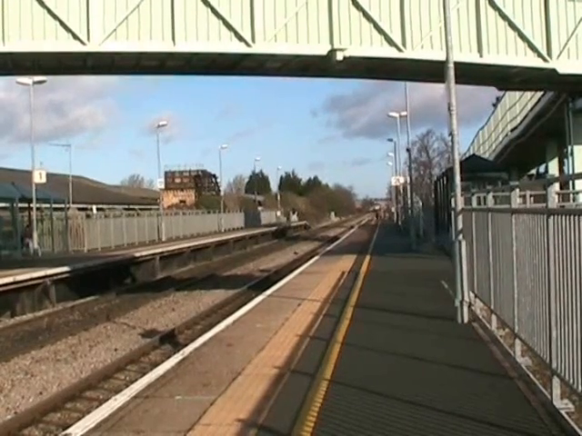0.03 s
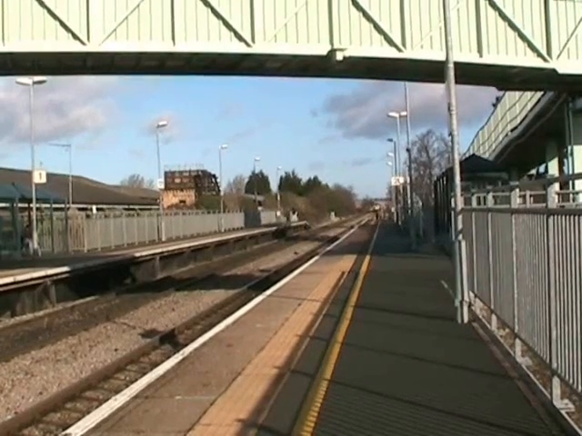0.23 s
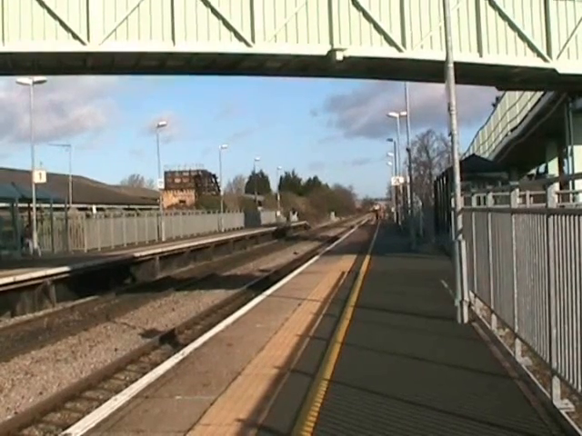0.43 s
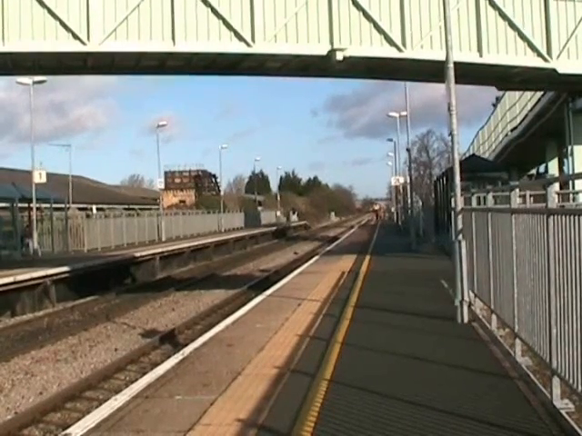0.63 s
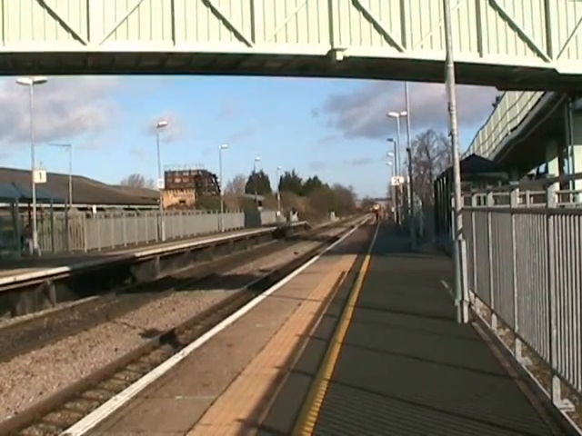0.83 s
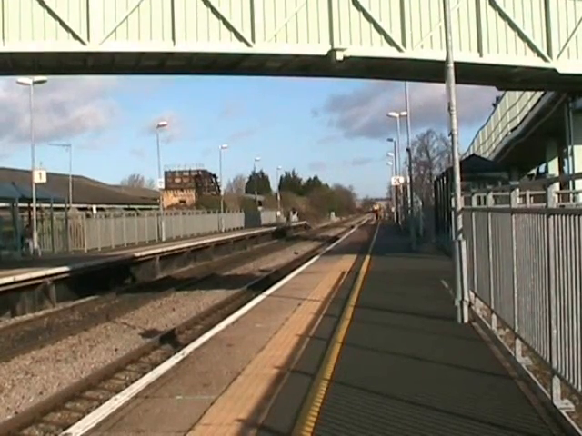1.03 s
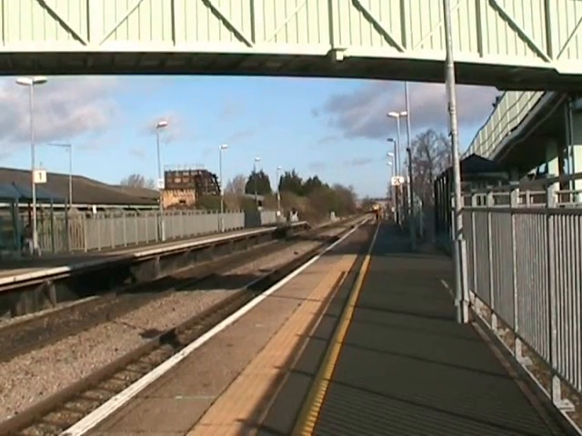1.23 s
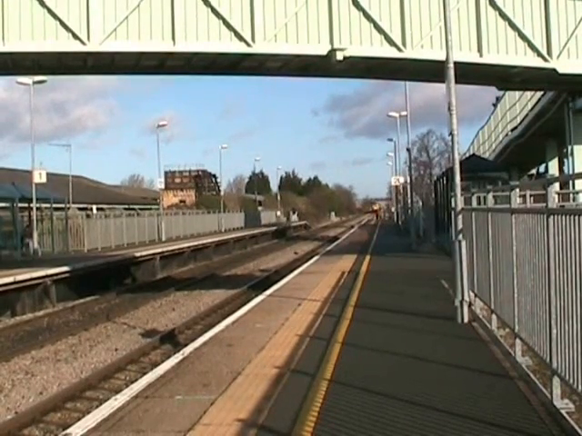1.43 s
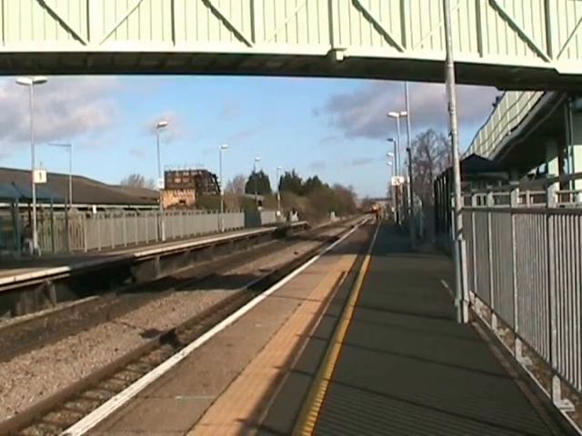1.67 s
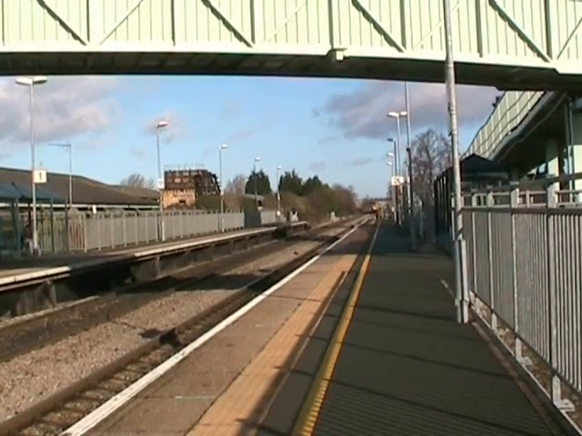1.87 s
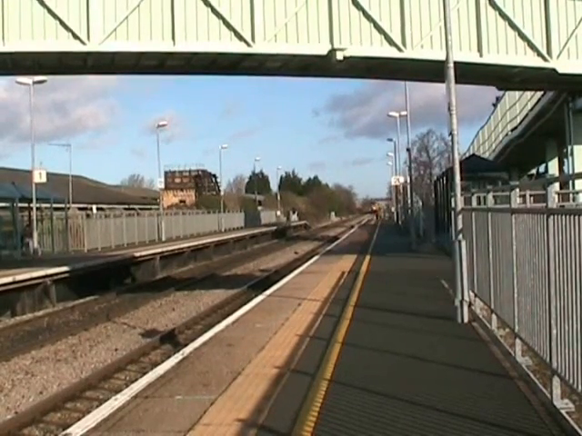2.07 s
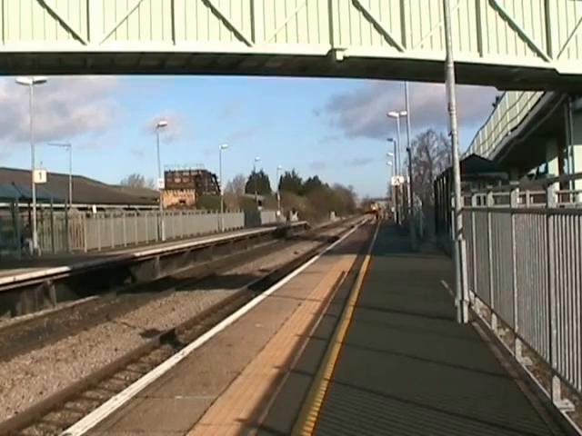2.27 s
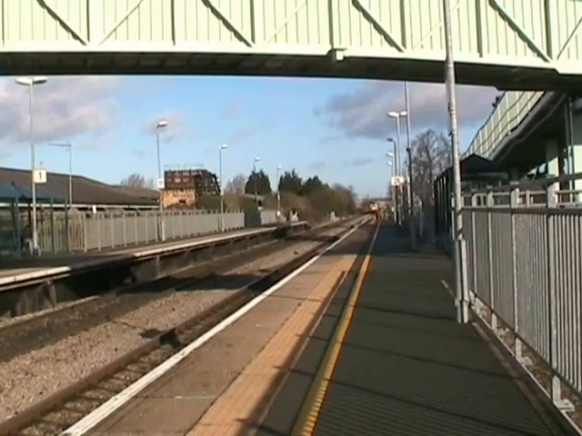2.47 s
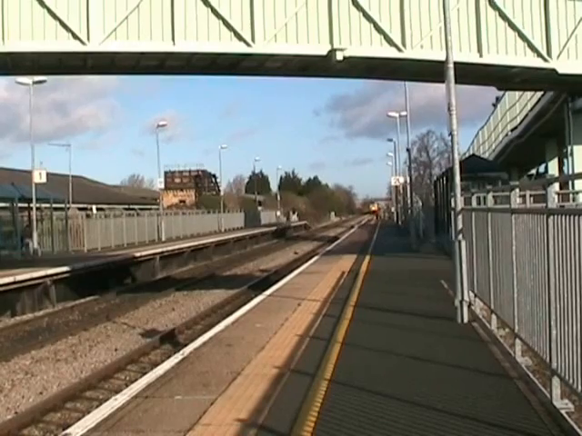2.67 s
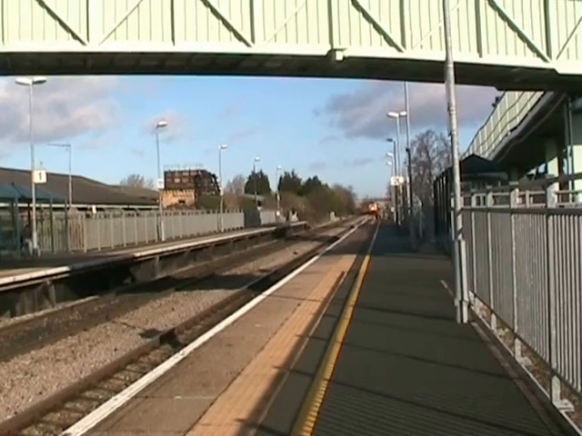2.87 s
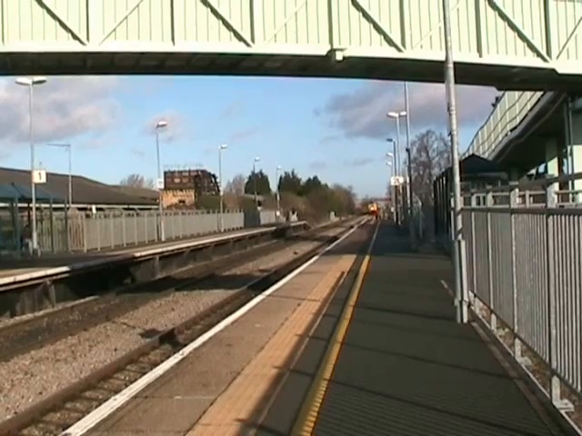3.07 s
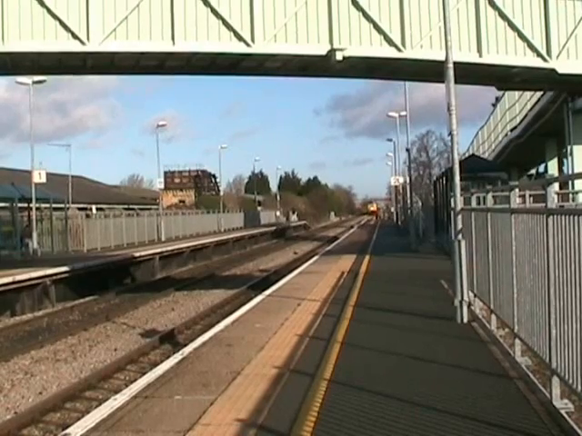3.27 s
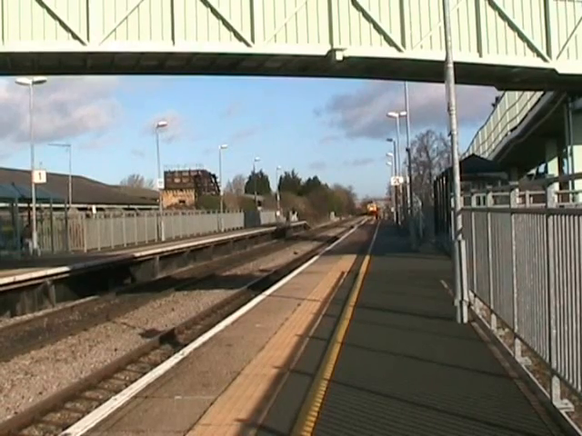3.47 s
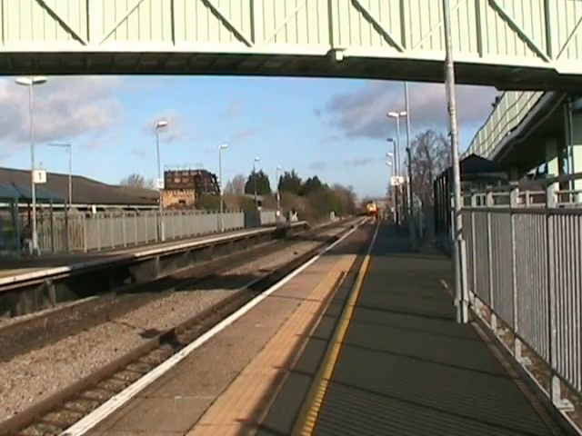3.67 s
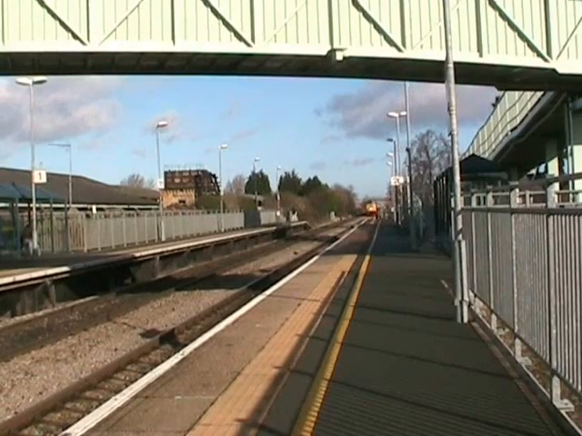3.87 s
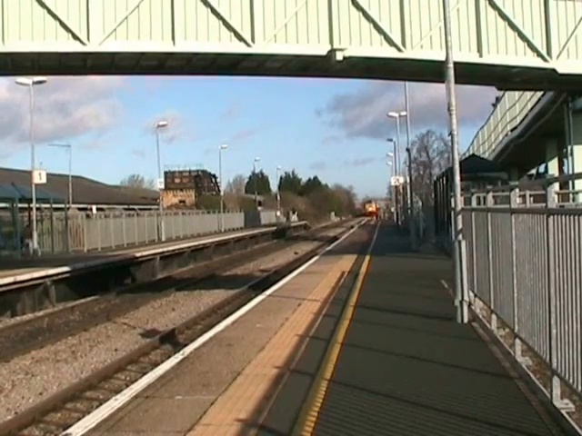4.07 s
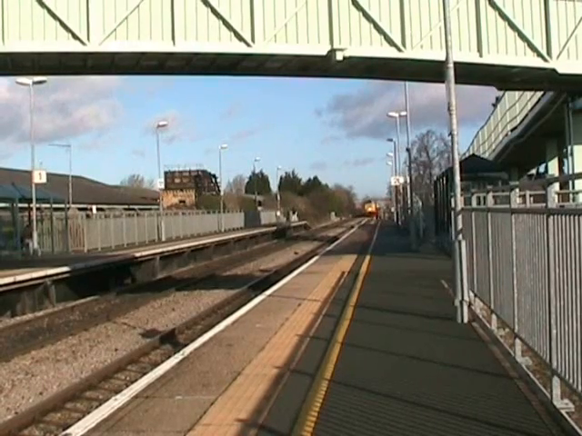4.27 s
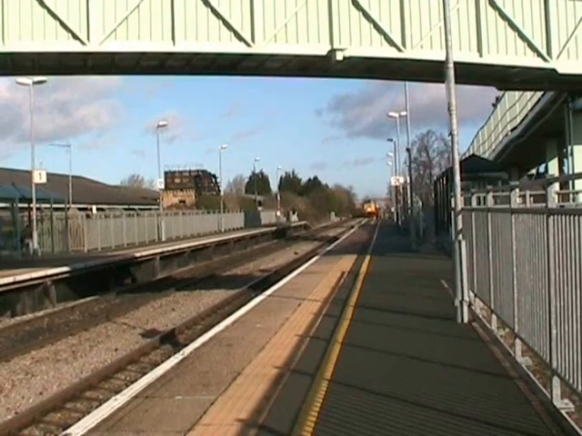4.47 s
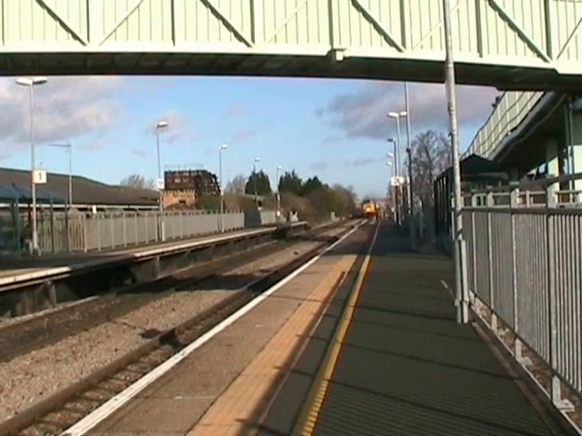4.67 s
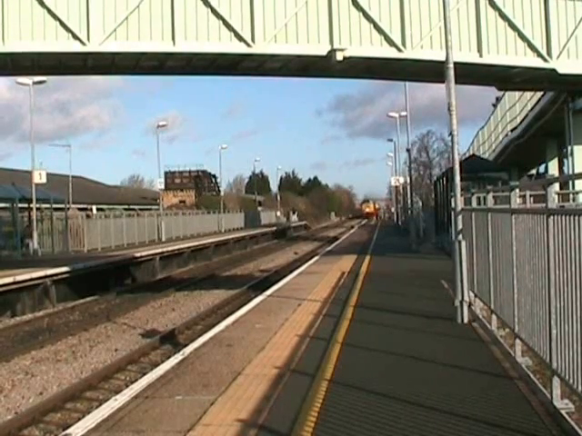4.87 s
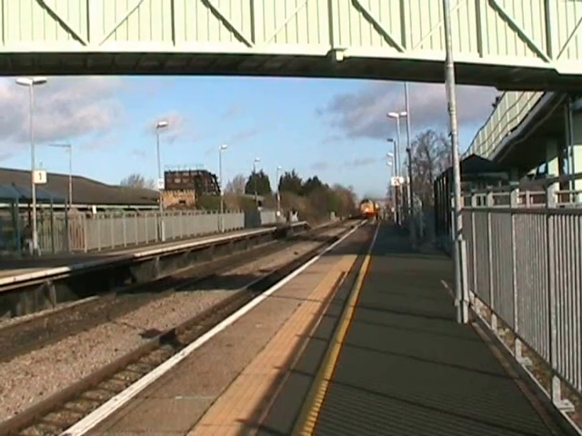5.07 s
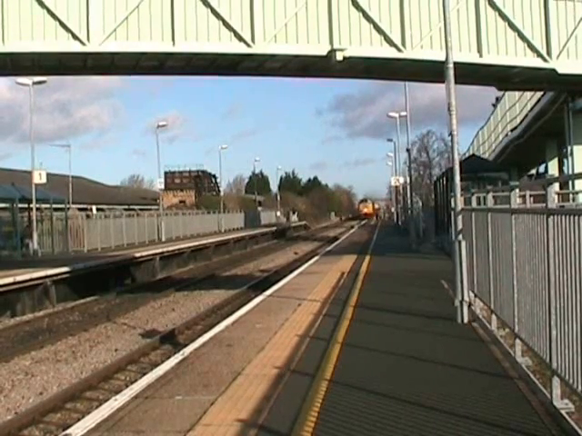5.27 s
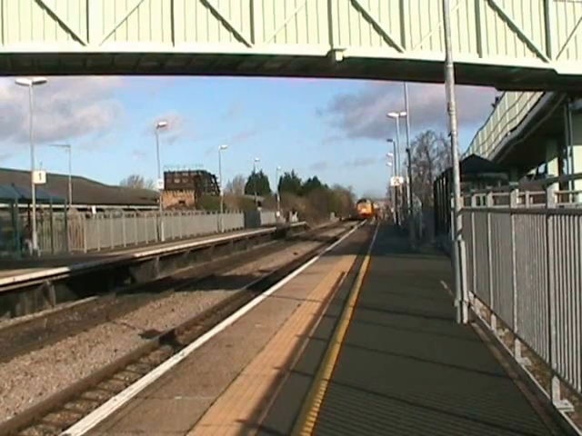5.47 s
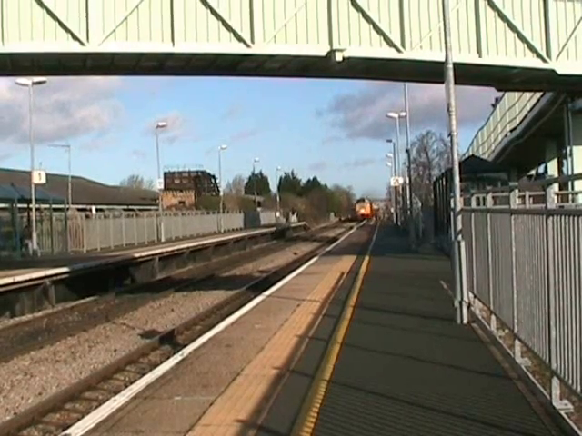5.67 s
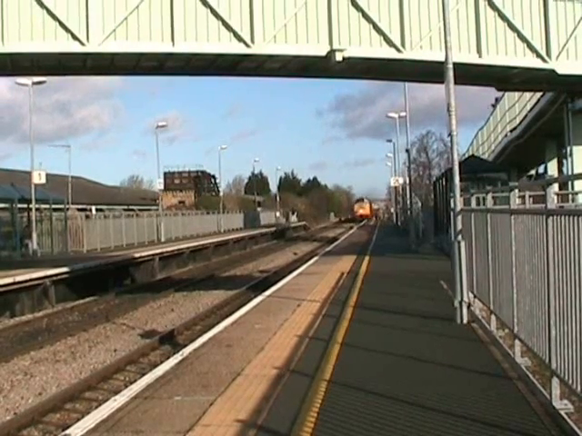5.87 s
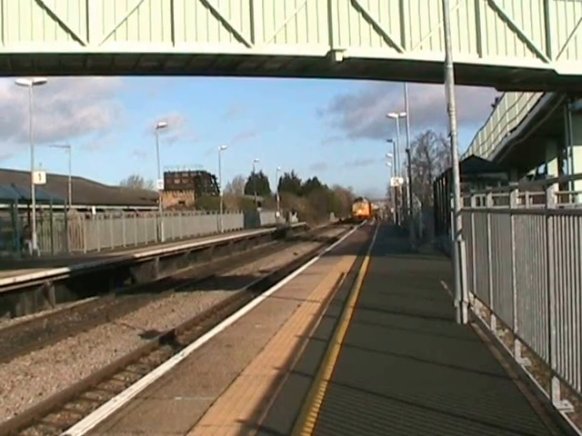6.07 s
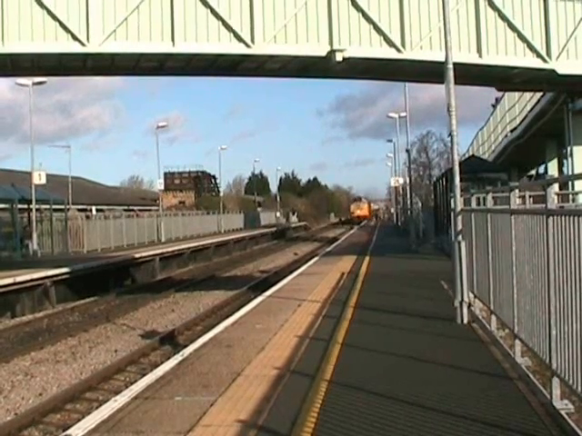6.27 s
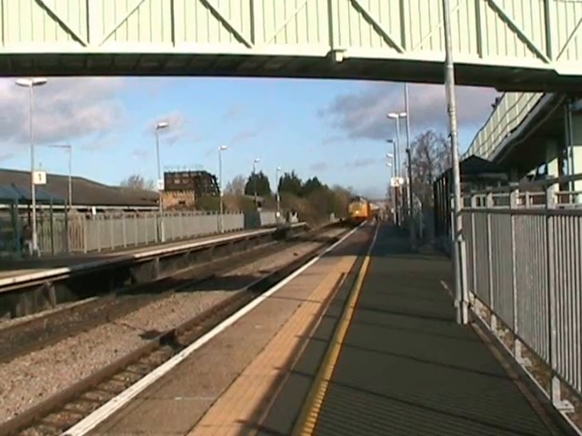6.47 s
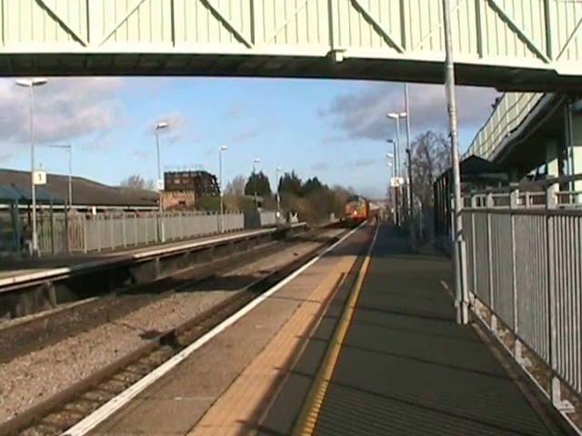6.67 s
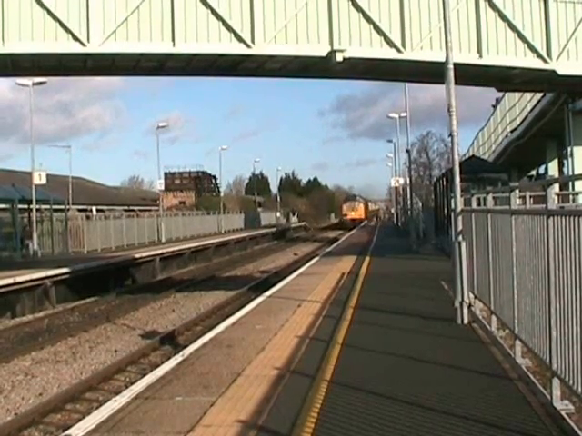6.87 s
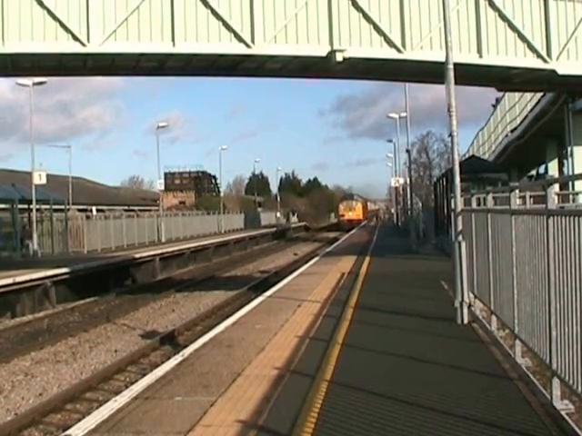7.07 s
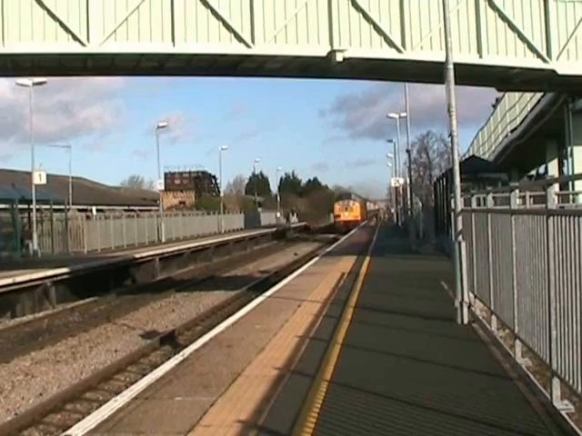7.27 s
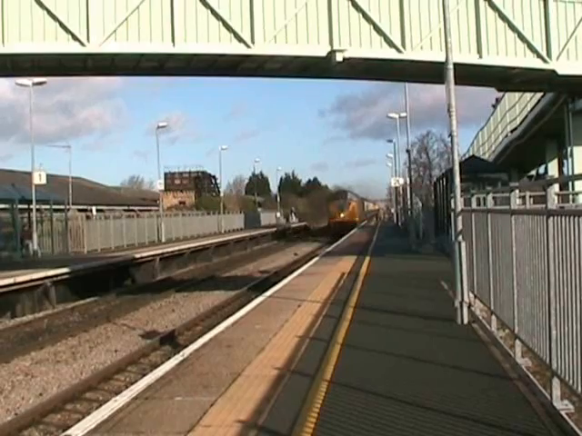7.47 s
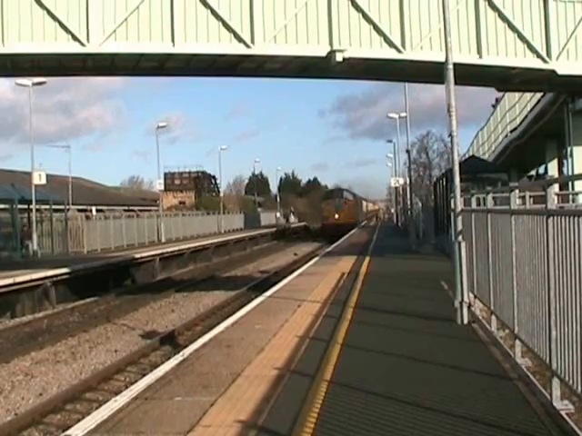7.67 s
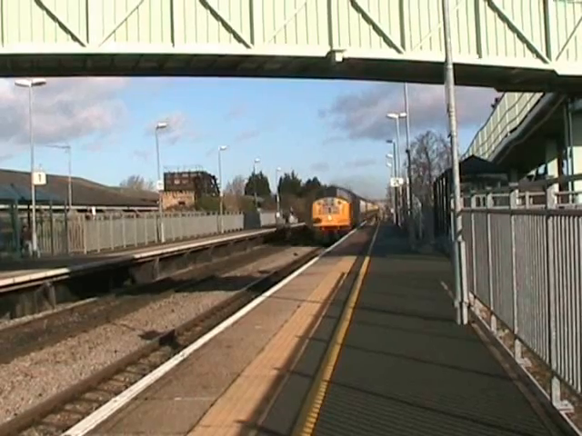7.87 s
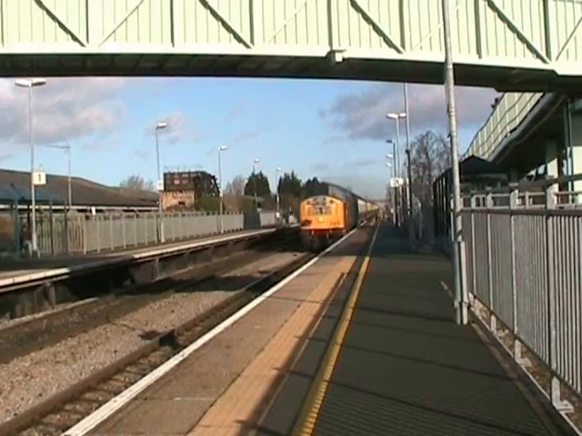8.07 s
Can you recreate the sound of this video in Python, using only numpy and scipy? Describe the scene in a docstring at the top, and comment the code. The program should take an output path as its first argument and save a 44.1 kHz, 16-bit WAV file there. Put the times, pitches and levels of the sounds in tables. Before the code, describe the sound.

A stationary stereo camera microphone on an open station platform picks up airy hiss, a faint hum, thin motor whine and a distant diesel throb. A tiny click comes at 0.5 s. From about 1 to 4 s a far road vehicle gathers speed, its low drone rising in pitch and wavering in level, while the locomotive's bass fades and returns. Close dry clicks cluster at 2.65 s and again near 3.05 s, with soft swishes around them. A thin, high squeal lingers faintly from 3.15 to 5 s. The engine swells with a hollow ring around 3.7 s, and its low bark growls near 5.2 s. From 5 to 8 s the uneven, rapid throb becomes a heavy full-power roar, with brightening wheel and rail hiss. Near the end automatic gain holds the level; the locomotive is still approaching when the sound stops at about 8 s.

```python
"""A faint hum, airy hiss and a distant throb come first; then a diesel locomotive under full power nears
a station platform, heard by a camera standing still. Sixteen uneven cylinders make the throb, a stack of
engine-cycle orders summed as sines, and filtered noise puffs in step as the roar. Wheels and rails hiss
more as it nears, until gain control holds the level. Sines also make a far road vehicle that gathers
speed, a thin squeal and a faint camera-motor whine; noise bursts with damped rings make close clicks."""
import sys
import numpy as np
from scipy import signal
from scipy.fft import rfft, irfft, next_fast_len
from scipy.io import wavfile
from scipy.ndimage import uniform_filter1d, map_coordinates

SR = 44100
rng = np.random.default_rng(int(sys.argv[2]) if len(sys.argv) > 2 else 0)


def digitize_waveform(pressure):
    """Quantize a signal to 16-bit integers and store it at the path in sys.argv[1].

    Rows of a 2-D input are taken as channels; values are limited to [-1, 1].
    """
    field = np.atleast_2d(pressure).T
    bounded = np.clip(field, -1, 1)
    quanta = np.round(bounded * 32767).astype(np.int16)
    wavfile.write(sys.argv[1], SR, quanta)


N = 357651
T = np.arange(N) / SR  # s
HZ = np.fft.rfftfreq(N, 1 / SR)

# Exhaust orders: (multiple of the cycle rate [1], relative level [dB]); order 11 takes the boom's level
EXHAUST_ORDERS = [(3, -33), (5, -14), (7, -8.5), (8, -12), (10, -10.5), (11, -2), (13, -9.5), (15, -22),
                  (16, -5), (17, -17), (18, -6), (19, -13.5), (20, 1.5), (21, -3.5), (22, -5), (23, -16),
                  (24, -6), (25, -19), (26, -5), (27, -5), (28, -11), (29, -16.5), (30, -12.5), (31, -8)]
# Orders that howl faintly through the roar: (multiple of the cycle rate [1], level against the roar [dB])
HOWLING_ORDERS = [(38, -19.5), (39, -22), (41, -20), (42, -20), (48, -21), (51, -21), (52, -17), (54, -18),
                  (60, -20), (63, -21.5), (67, -20.5), (76, -21.5)]
# Throb of each exhaust register: (upper limit [Hz], place in the cycle [0-1], relative phase scatter [1])
THROB_REGISTERS = [(115, .41, 0.52), (212, .82, 0.57), (400, .155, 0.65)]
# Strength of each cylinder's puff, in firing order: one column, relative level [dB]
CYLINDER_PUFFS = [-5, -3, -3, -2.5, -6, -5.5, -0.5, -9, -7.5, -1.5, -5, -2, -1.5, -7.5, -5.5, -5]
# Blower tones: (frequency [Hz], level against the exhaust roar [dB])
BLOWER_TONES = [(260.5, -14.5), (300, -19.5)]
# The bass fades and returns on its way: (time [s], boom level change [dB], beat level change [dB])
BASS_FADING = [(0, -12, 0.5), (1.35, 0, -4.5), (1.7, -19, -3), (2.0, -4, -4), (2.4, -1, -9), (3.1, 1, -7),
               (3.7, 1, -3.5), (4.5, 1.5, -6.5), (5.2, 1, -3), (5.7, 1.5, -2.5), (6.25, -5.5, 0),
               (6.6, -1.5, 0), (7.3, 1, -1), (7.7, 0.5, 0.5), (8.11, -5, -2.8)]
# Noise spectra of the locomotive: (frequency [Hz], relative density [dB])
RUMBLE_SPECTRUM = [(15, -22), (30, -18), (50, -5), (70, 8), (100, 5), (160, 0.5), (400, -75)]
BARK_SPECTRUM = [(50, -39), (90, 0), (125, -1.5), (170, -2), (245, -3.5), (285, -8.5), (400, -3),
                 (900, -88)]
ROAR_SPECTRUM = [(150, -16), (280, -4.5), (340, -2), (440, 1), (540, 2.5), (640, 3), (760, -1), (880, -10),
                 (1200, -7), (2000, -14), (5000, -77)]
ROLLING_SPECTRUM = [(300, -11), (800, -5), (1080, 2.5), (1280, -1), (1500, 1.5), (1750, -2), (2050, -4),
                    (2500, -9), (3300, -14.5), (5000, -19.5), (6500, -26), (9000, -34), (11500, -40.5),
                    (13000, -63)]
# Noise spectra of the clicks and of the open air: (frequency [Hz], relative density [dB])
CLICK_SPECTRUM = [(600, -25), (1500, 10.5), (2500, 7), (4300, 4.5), (6500, 0), (8500, -2), (10200, 0),
                  (11500, -38)]
AIR_SPECTRUM = [(40, 15), (200, 16), (350, 17.5), (500, 18.5), (850, 28.5), (1300, 19), (2500, 6),
                (3500, 1), (5000, 1), (5600, 5.5), (6800, -6.5), (8200, -17), (9300, 1.5), (10200, -9.5),
                (11000, 6.5), (11700, -26), (12500, -15.5)]
# Stereo width of train and air: (frequency [Hz], opposed against shared part [dB])
TRAIN_WIDTH = [(30, -4), (70, -31), (200, -6), (700, -15.5), (1400, -11.5), (2300, -26), (4000, -15),
               (7000, -6.5), (9000, -5), (11000, 10), (12500, 26)]
AIR_WIDTH = [(100, 15.5), (1500, -9), (3000, 4), (4200, -2.5), (6000, -2), (8000, -1), (11000, 5.5),
             (12500, 24.5)]
# Small close clicks: (time [s], nominal snap level [dB], ring [Hz], ring level [dB], snap decay [s],
# upper edge [Hz])
CLOSE_CLICKS = [(.499, -42, 2100, -34, 0.012, 7000), (2.65, -32, 2770, -22, 0.002, 10500),
                (2.6547, -33.5, 3000, -31, 0.0036, 11000), (2.6584, -37, 2100, -23, 0.0016, 10000),
                (2.6645, -41, 2300, -17, 0.0012, 7400), (3.0536, -38, 4040, -37, 0.015, 5000),
                (3.076, -35, 2100, -26, 0.007, 4800), (3.0805, -40, 1350, -20, 0.004, 3500)]
# Camera motor whine: (frequency [Hz], level before flutter [dB])
MOTOR_LINES = [(5233, -71), (5400, -66), (5700, -71), (5850, -75), (6000, -76), (6137, -73), (6332, -76),
               (9300, -76), (9900, -78), (11100, -80), (12300, -80)]
# Faint hisses and soft swishes, some around the clicks: (start [s], end [s], centre [Hz], width [Hz],
# level before flicker [dB])
HISS_BANDS = [(-.5, 0.704, 5300, 3000, -59), (.37, 0.568, 3000, 3200, -51), (1.1, 3.0, 2220, 450, -51),
              (1.5, 2.25, 4330, 1300, -54), (1.95, 2.45, 7800, 600, -63.5), (2.61, 2.697, 4000, 3600, -50),
              (2.88, 3.024, 5400, 1500, -53.5), (3.8, 4.02, 3900, 600, -60), (3.85, 4.06, 5700, 900, -59)]
# Thin squeal, one row: (start [s], end [s], frequency [Hz], level before flutter [dB])
SQUEAL_TONE = (3.15, 5, 3379.5, -59)
# Far road vehicle as it pulls and eases off: (time [s], level before flutter [dB])
VEHICLE_LEVEL = [(.5, -72), (1.35, -38.5), (1.75, -48), (1.98, -36), (2.7, -38), (3.0, -46), (3.6, -38),
                 (3.95, -37), (4.3, -80)]
# Distant hums that die away: (end [s], frequency [Hz], initial level [dB], fade [dB/s])
DISTANT_HUMS = [(1.9, 225.9, -39, 6), (2.3, 72.3, -43, 1)]
# Balance of the two microphone ports: (frequency [Hz], left minus right level [dB])
PORT_BALANCE = [(25, -4), (45, -8.5), (65, -18), (90, -12.5), (130, -8.5), (180, -4), (300, -1.3),
                (600, -0.6), (1500, 0)]

# engine cycle rate, and its starting lag in cycles
CYCLE_HZ, CYCLE_LAG = 8.327, .088
# steady run towards the platform: track offset, distance for nominal levels, moment of closest approach
SPEED_M_PER_S, OFFSET_M, NEAR_M, ARRIVAL_S = 30, 4, 80, 9.316
DISTANCE_M = np.hypot(SPEED_M_PER_S * (ARRIVAL_S - T), OFFSET_M)
# nominal level at NEAR_M before trims [dB], and growth each time the distance halves [dB]
DRONE_DB, DRONE_GROWTH_DB = -34, 6.5
BOOM_DB, BOOM_GROWTH_DB = -26, 8.5
BEAT_DB, BEAT_GROWTH_DB = -18, 12
ROAR_DB, ROAR_GROWTH_DB = -20, 12
ROLLING_DB, ROLLING_GROWTH_DB = -25, 11
# the same for treble from 8 kHz up, and for beat orders near 125 Hz, which open up inside NEAR_M
TREBLE_DB, TREBLE_GROWTH_DB = -3.5, 11.5
CHEST_DB, CHEST_GROWTH_DB = 0, 9
BEAT_UNEVEN_DB = 0.8  # rms spread of beat strength
ORDER_WAVER = 0.14  # waver of a beat order at 200 Hz
# beyond CLEAR_M the beat blurs into noise, fully so BLUR_M farther out
CLEAR_M, BLUR_M = 93, 68
# the far engine swells once: lift of the drone and of the howling orders
SWELL_AT_S, SWELL_HALF_S, SWELL_DRONE_DB, SWELL_HOWL_DB = 3.7, 0.4, 3, 5.5
# hollow ring of the roar: its steady share and the share added by the swell
RING_HZ, RING_STEADY, RING_SWELL = 440, 0.1, 0.4
# a little later the low bark rings for a moment
GROWL_AT_S, GROWL_HALF_S, GROWL_HZ, GROWL_SHARE = 5.2, 0.76, 230, 0.78
# decay of a click's ring; level and decay of its scatter
CLICK_RING_S, CLICK_SCATTER_DB, CLICK_SCATTER_S = 0.0015, -17, 0.034
# pitch law of the far vehicle: start, rise and growth of the rise
VEHICLE_HZ, VEHICLE_HZ_PER_S, VEHICLE_HZ_PER_S2 = 80.8, 2.5, 2.15
HELD_ATTACK_S, HELD_RELEASE_S = 0.056, 0.21
# gain control: threshold, compression ratio, power smoothing time; then the upper band limit
LIMIT_DB, LIMIT_RATIO, LIMIT_S = -14.5, 37, 0.11
EDGE_HZ = 12700


def locomotive():
    """Superposition: exhaust orders, gas noise, blower and rolling noise grow as the distance shrinks."""
    boom_fade_db, beat_fade_db = follow(BASS_FADING)
    swell = np.exp(-((T - SWELL_AT_S) / SWELL_HALF_S) ** 2)
    growl = np.exp(-((T - GROWL_AT_S) / GROWL_HALF_S) ** 2)
    drone_db = approach(DRONE_DB, DRONE_GROWTH_DB) + SWELL_DRONE_DB * swell
    roar_db = approach(ROAR_DB, ROAR_GROWTH_DB)
    boom_db = approach(BOOM_DB, BOOM_GROWTH_DB) + boom_fade_db
    beat_db = approach(BEAT_DB, BEAT_GROWTH_DB) + beat_fade_db + BEAT_UNEVEN_DB * drift(CYCLE_HZ)
    turns = CYCLE_HZ * T - CYCLE_LAG + 0.00089 * drift(1.5)
    # from far away the sound arrives scattered: the beat is blurred into noise
    far = np.clip((DISTANCE_M - CLEAR_M) / BLUR_M, 0, 1)

    tones = exhaust_tone(turns, drone_db, boom_db, beat_db - 6 * far)
    for order, db in HOWLING_ORDERS:
        tones += tone(order * CYCLE_HZ, roar_db + db + SWELL_HOWL_DB * swell, flutter=0.41)
    for hz, db in BLOWER_TONES:
        tones += tone(hz, roar_db + db - 6 * far ** 2, flutter=0.86)

    rumble = noise(RUMBLE_SPECTRUM, TRAIN_WIDTH) * gain_of(drone_db - 2)
    bark = noise(BARK_SPECTRUM, TRAIN_WIDTH) * gain_of(beat_db - 6.5 + 7.5 * far)
    bark *= puffs(turns, depth=0.35)
    bark += GROWL_SHARE * growl * resonance(bark, GROWL_HZ, 4)
    roar = noise(ROAR_SPECTRUM, TRAIN_WIDTH) * gain_of(roar_db - 1.78 + 0.53 * drift(14))
    roar *= puffs(turns, depth=0.76)
    roar += (RING_STEADY + RING_SWELL * swell) * resonance(roar, RING_HZ, 2.5)
    return tones + rumble + bark + roar + rolling(approach(ROLLING_DB, ROLLING_GROWTH_DB), turns)


def exhaust_tone(turns, drone_db, boom_db, beat_db):
    """Fourier synthesis: cycle orders line up once a cycle in a sharp pressure dip, the heavy beat."""
    order, db = np.transpose(EXHAUST_ORDERS)
    height = gain_of(db)
    drone = gain_of(drone_db - 1.5) / np.sqrt((height[order < 10] ** 2).sum())
    beat = gain_of(beat_db - 2.0) / np.sqrt((height[order > 16] ** 2).sum())
    chest_db = np.maximum(approach(CHEST_DB, CHEST_GROWTH_DB), 0)
    out = np.zeros(N)
    for k, h in zip(order, height):
        hz = k * CYCLE_HZ
        if k == 11:
            level, waver = gain_of(boom_db), .05
        elif k < 10:
            level, waver = h * drone, .12
        else:
            chest = gain_of(chest_db * np.exp(-((hz - 125) / 35) ** 2))
            level, waver = h * beat * chest, ORDER_WAVER * (hz / 200) ** 2
        # echoes from ground and buildings scatter each phase and make it waver, most in the high beat orders
        _, place, scatter = next((row for row in THROB_REGISTERS if hz < row[0]), THROB_REGISTERS[-1])
        offset = scatter * rng.uniform(-0.77, 1) * np.sqrt(3)
        angle = 2 * np.pi * k * (turns - place) + offset + waver * drift(4.4)
        out -= level * (1 + waver * drift(4)) * np.cos(angle) / np.sqrt(1 + waver ** 2)
    return np.sqrt(2) * out


def puffs(turns, depth):
    """Amplitude modulation: gas flow varies through the cycle, cylinder by cylinder."""
    count = len(CYLINDER_PUFFS)
    flow_db = np.interp(turns, np.arange(count) / count, CYLINDER_PUFFS, period=1)
    return evened(gain_of(depth * flow_db))


def rolling(level_db, turns):
    """Air absorption: treble of wheels, rails and fans opens up as the air path shortens."""
    hz, t, bins = signal.stft(noise(ROLLING_SPECTRUM, TRAIN_WIDTH), SR, nperseg=512)
    clear_db = np.interp(t, T, approach(TREBLE_DB, TREBLE_GROWTH_DB))
    loss_share = np.clip((hz - 1500) / 6500, 0, 1) ** 2.2
    bins = bins * gain_of(loss_share[:, None] * clear_db)
    hiss = signal.istft(bins, SR, nperseg=512)[1][:, :N]
    return hiss * gain_of(level_db + 0.51 * drift(25)) * puffs(turns, depth=0.2)


def approach(db, growth_db):
    """Distance law: a level in dB grows by a fixed step each time the distance halves."""
    return db + growth_db * np.log2(NEAR_M / DISTANCE_M)


def clicks():
    """Impulse response: short dry snaps, each with a damped ring and faint scatter from the platform."""
    out = np.zeros((2, N))
    grit = evened(colour(rng.standard_normal(N), CLICK_SPECTRUM))
    scatter = gain_of(CLICK_SCATTER_DB) * noise(CLICK_SPECTRUM, AIR_WIDTH)
    for s, db, ring_hz, ring_db, decay, edge_hz in CLOSE_CLICKS:
        age = np.clip(T - s, 0, .5)
        burst = 1.16 * grit * np.exp(-age / decay) + scatter * np.exp(-age / CLICK_SCATTER_S)
        snap = gain_of(db) * (T > s) * burst
        out += signal.lfilter(*signal.butter(4, edge_hz, fs=SR), snap)
        out += gain_of(ring_db) * np.exp(-age / CLICK_RING_S) * np.sin(2 * np.pi * ring_hz * age)
    return out


def camera_motor():
    """Line spectrum: thin unsteady tones reach each port by its own path."""
    return np.array([sum(tone(hz, db, flutter=.25) for hz, db in MOTOR_LINES) for _ in range(2)])


def hisses_and_squeal():
    """Band-limited noise: hisses swell, flicker and fade, beside one thin fluttering squeal."""
    start, end, hz, db = SQUEAL_TONE
    out = tone(hz, held(start, end, db, 0), flutter=.25)
    for start, end, hz, width, db in HISS_BANDS:
        band = irfft(rfft(rng.standard_normal(N)) * np.exp(-2 * ((HZ - hz) / width) ** 2), N)
        progress = np.clip((T - start) / (end - start), 0, 1)
        arch = np.abs(np.sin(np.pi * progress)) ** 0.94
        out += gain_of(db + 0.97 * drift(18)) * evened(band) * arch
    return out


def traffic():
    """Frequency sweep: a far road vehicle's pitch rises ever faster, beside two hums of fixed pitch."""
    rising_hz = VEHICLE_HZ + VEHICLE_HZ_PER_S * T + VEHICLE_HZ_PER_S2 * T ** 2
    hums = sum(tone(hz, held(0, end, db, fade_db), flutter=0.13) for end, hz, db, fade_db in DISTANT_HUMS)
    return tone(rising_hz, follow(VEHICLE_LEVEL)[0], flutter=.1) + hums


def surroundings():
    """Diffuse background: open air and microphone hiss, with the drone of distant traffic."""
    return gain_of(-42.0) * patchy(noise(AIR_SPECTRUM, AIR_WIDTH), depth_db=1.0) + traffic()


def patchy(x, depth_db):
    """Random modulation: treble hiss flickers in patches of about 700 Hz by 0.1 s."""
    hz, t, bins = signal.stft(x, SR, nperseg=512)
    patches = uniform_filter1d(rng.standard_normal((len(t), len(hz))), size=18, axis=0)
    patches = evened(uniform_filter1d(patches, size=8, axis=1))
    treble = np.clip(hz / 2500, 0, 1)
    return signal.istft(bins * gain_of(depth_db * treble * patches).T, SR, nperseg=512)[1][:, :N]


def noise(spectrum, width):
    """Stereo coherence: left and right noise are a shared part plus and minus an opposed part."""
    mid, side = colour(rng.standard_normal((2, N)), spectrum)
    side = colour(side, width)
    return np.array([mid + side, mid - side]) / mid.std()


def tone(hz, db, flutter):
    """Flutter: a sine's level and phase waver through slow random in-phase and quadrature parts."""
    angle = 2 * np.pi * (np.cumsum(hz * np.ones(N)) / SR + rng.random())
    in_phase = (1 + flutter * drift(8.6)) * np.cos(angle)
    quadrature = flutter * drift(6) * np.sin(angle)
    return np.sqrt(2) * gain_of(db) * (in_phase + quadrature)


def held(start, end, db, fade_db):
    """Envelope: a level in dB comes in, fades by fade_db a second and dies after its end."""
    attack = np.clip((T - start) / HELD_ATTACK_S, 0, 1)
    release = np.clip(1 - (T - end) / HELD_RELEASE_S, 0, 1)
    return db - fade_db * np.maximum(T - start, 0) + 20 * np.log10(attack * release + 1e-9)


def resonance(x, hz, q):
    """Resonance: a second-order band-pass of quality q."""
    return signal.lfilter(*signal.iirpeak(hz, q, SR), x)


def drift(rate):
    """Random modulation: a slow curve of rms 1 that changes about rate times a second."""
    knots = rng.standard_normal(2048)
    coarse = T[::256]
    curve = map_coordinates(knots, [coarse * rate], order=3, mode="wrap")
    return np.interp(T, coarse, evened(curve))


def colour(x, points):
    """Linear filtering: multiplies the spectrum by a table's gain."""
    size = next_fast_len(N, True)
    gain = gain_of(read(points, np.fft.rfftfreq(size, 1 / SR)))
    return irfft(rfft(x, size) * gain, size)[..., :N]


def read(points, hz):
    """Interpolation: reads a spectrum table on a log-frequency axis."""
    f, value = np.transpose(points)
    return np.interp(np.log(hz + 1), np.log(f + 1), value)


def follow(rows):
    """Interpolation: reads every column of a time table at each sample."""
    s, *columns = np.transpose(rows)
    return [np.interp(T, s, column) for column in columns]


def evened(x):
    """Normalisation: scales to rms 1."""
    return x / np.sqrt(np.mean(x ** 2) + 1e-20)


def gain_of(db):
    """Decibel law: level to amplitude."""
    return 10 ** (np.asarray(db) / 20)


def gain_control(x):
    """Compression: turns the level down once the smoothed power passes the limit."""
    keep = np.exp(-1 / (LIMIT_S * SR))
    power = signal.lfilter([1 - keep], [1, -keep], (x ** 2).mean(0))
    power_db = 10 * np.log10(power + 1e-12)
    return x / gain_of(np.maximum(power_db - LIMIT_DB, 0) * (1 - 1 / LIMIT_RATIO))


def scene():
    """Superposition: everything that reaches the platform adds up."""
    return locomotive() + clicks() + camera_motor() + hisses_and_squeal() + surroundings()


def record(dry):
    """Reception: left port has less bass; gain control, rounding of high peaks and a band limit follow."""
    right = [(hz, 20 * np.log10(2 / (1 + gain_of(db)))) for hz, db in PORT_BALANCE]
    left = [(hz, 20 * np.log10(2 / (1 + gain_of(-db)))) for hz, db in PORT_BALANCE]
    ports = gain_control(np.array([colour(dry[0], left), colour(dry[1], right)]))
    ports = ports / (1 + (ports / .98) ** 8) ** (1 / 8)
    low_pass = signal.firwin(511, EDGE_HZ, window=("kaiser", 9), fs=SR)
    return signal.oaconvolve(ports, low_pass[None], "same")


dry = scene()
out = record(dry)
digitize_waveform(out)
```